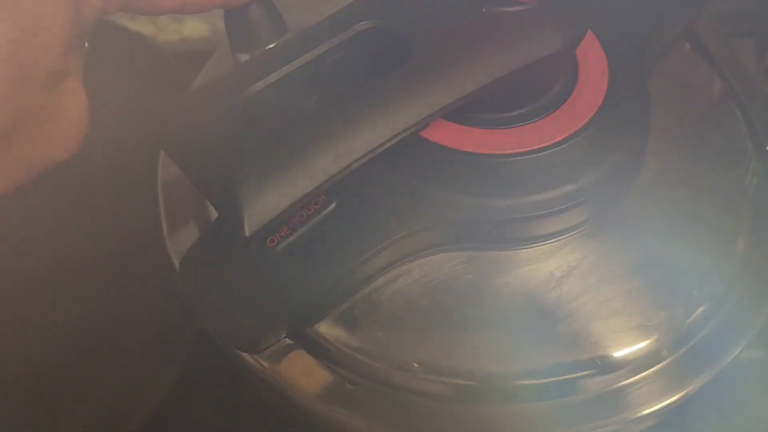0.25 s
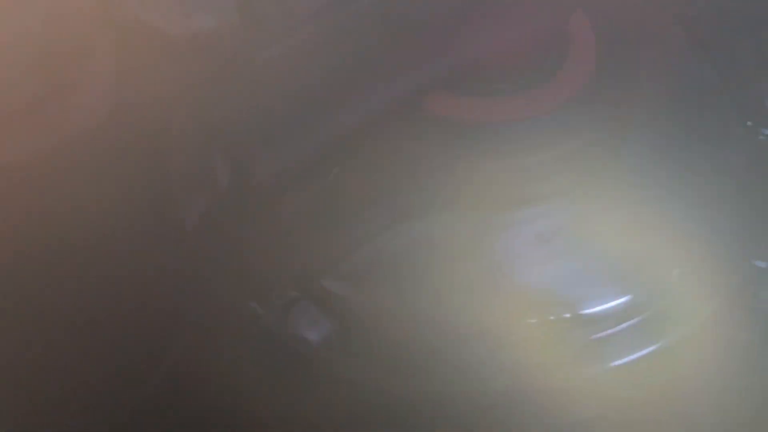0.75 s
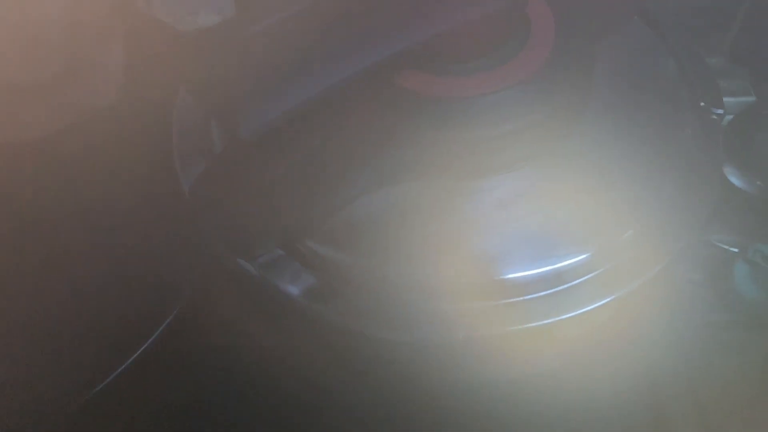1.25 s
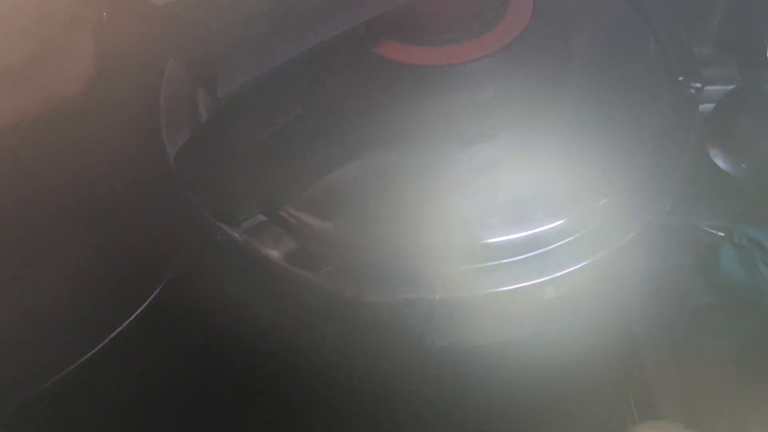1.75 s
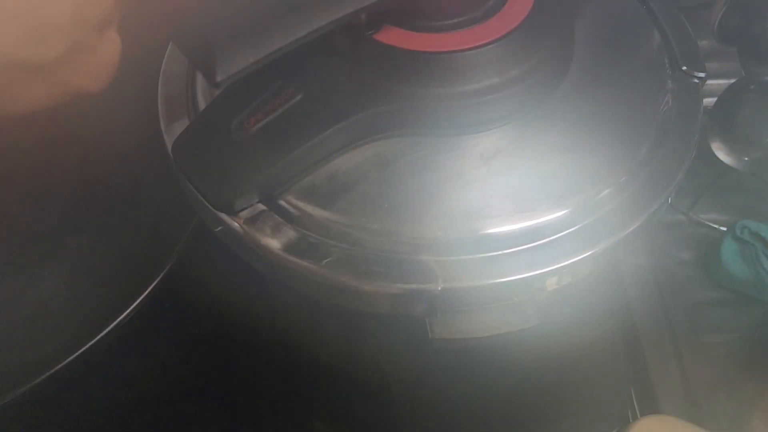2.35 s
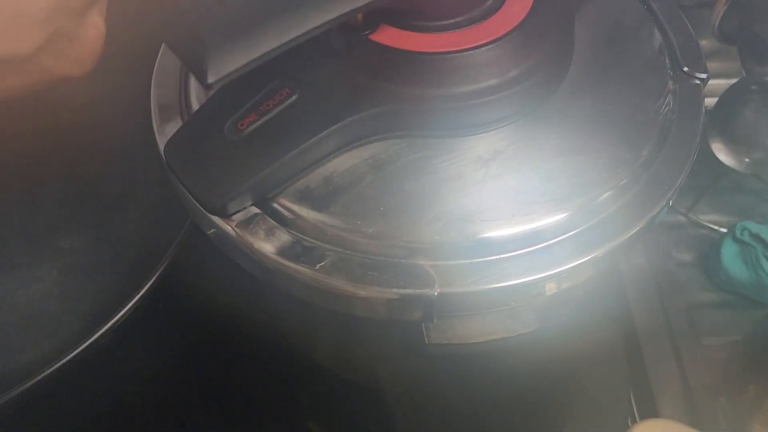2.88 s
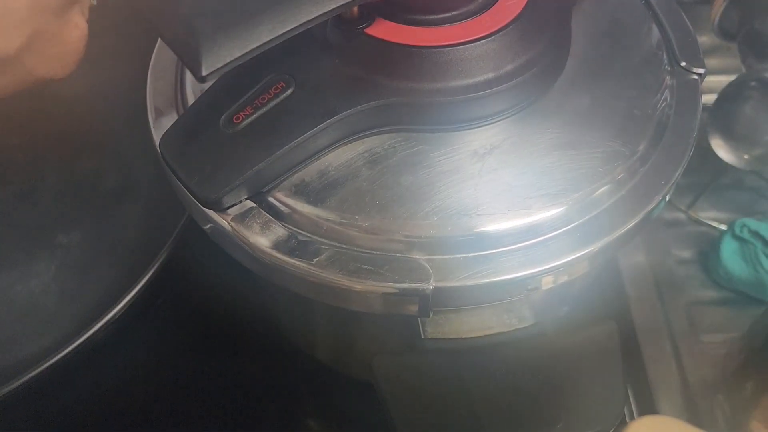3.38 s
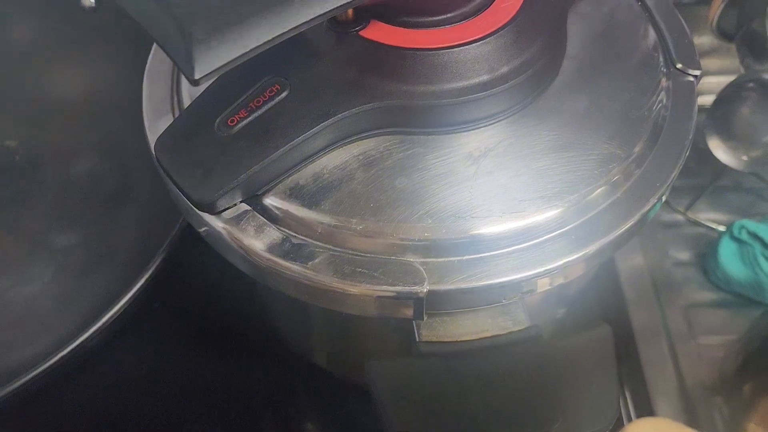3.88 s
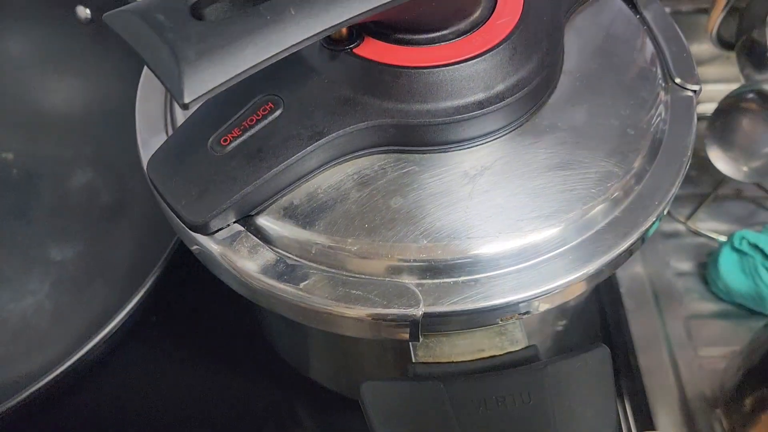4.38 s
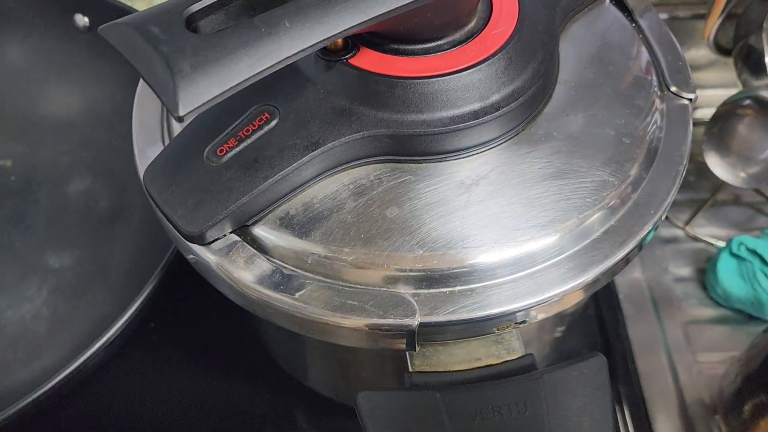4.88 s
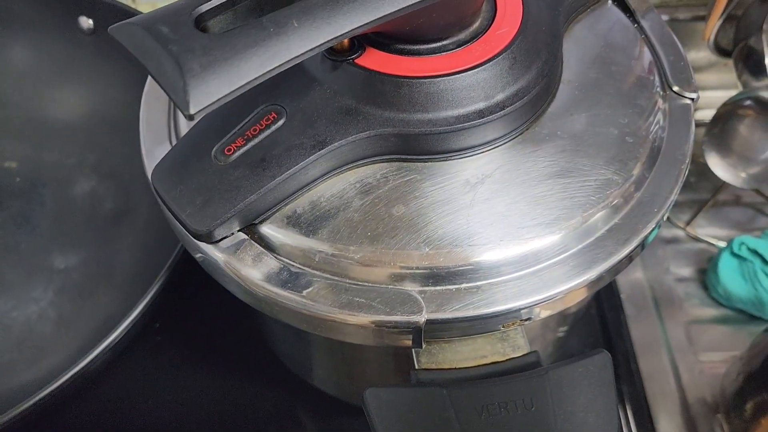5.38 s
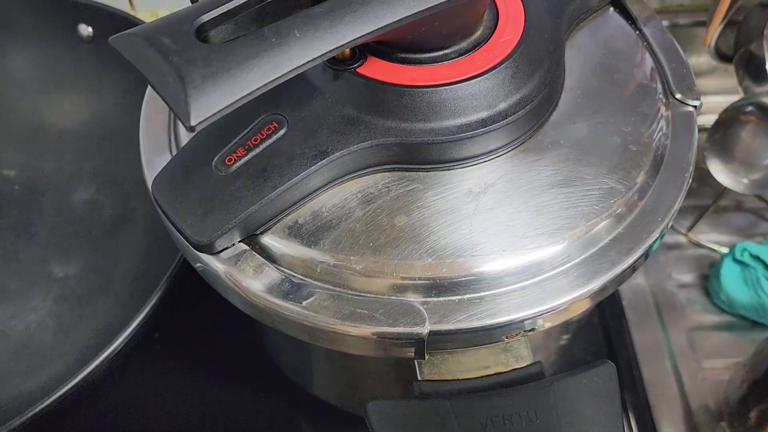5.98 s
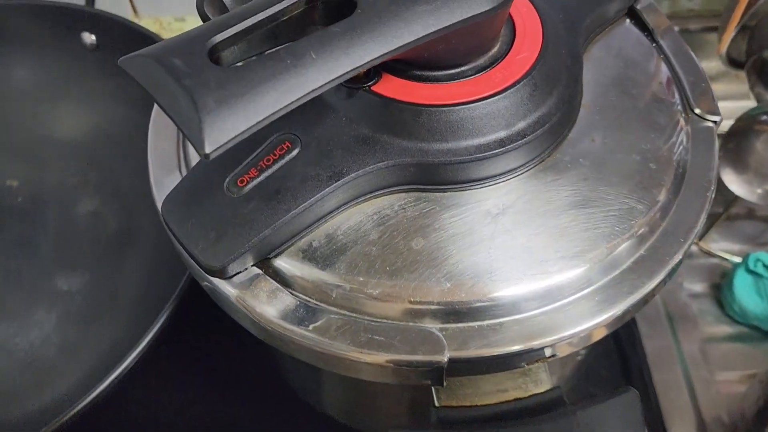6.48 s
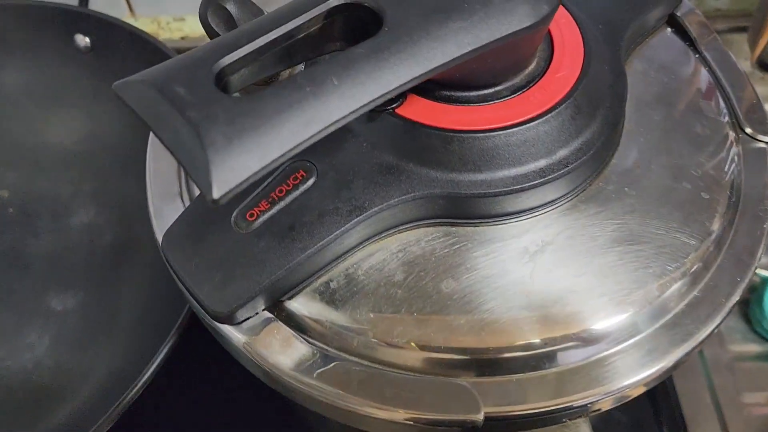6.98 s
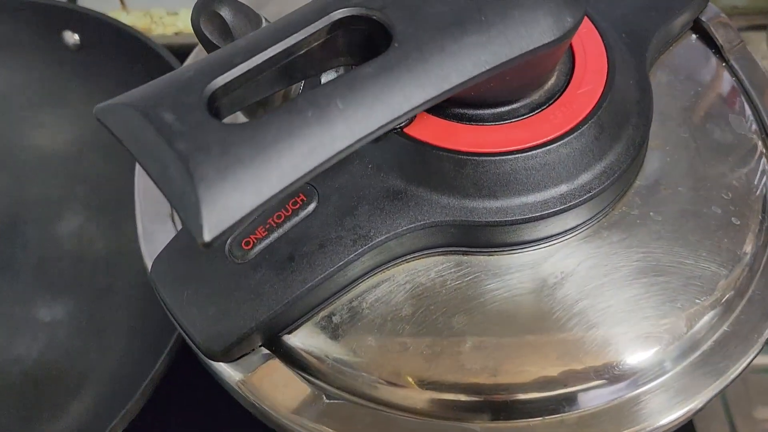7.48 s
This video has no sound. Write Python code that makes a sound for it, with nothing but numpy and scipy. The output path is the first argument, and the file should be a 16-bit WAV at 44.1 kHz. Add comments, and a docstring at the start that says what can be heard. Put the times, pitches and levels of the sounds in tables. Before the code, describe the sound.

A pressure cooker hisses steam, cuts off briefly with a rattle of lid clicks, then hisses on more weakly over a low fan hum.

```python
"""A small kitchen, a hand-held stereo phone close to the valve under a pressure cooker's handle.
Steam jets out over the low hum of a fan; as the pressure eases, an airy whistle forms at the valve's edge.
The valve pinches the jet at 1.3 s, snaps shut near 2 s with a rattle of the lid, leaks thinly for half a
second and is clicked open again. The jet runs on, weaker than at first, and from 6.4 s its colour shifts
as the phone leans in over the handle."""
import sys
import numpy as np
from scipy import signal
from scipy.fft import rfft, irfft
from scipy.io import wavfile
from scipy.ndimage import uniform_filter1d

SR = 44100
rng = np.random.default_rng(int(sys.argv[2]) if len(sys.argv) > 2 else 0)


def bounce(signal):
    """Save signal as a 16-bit WAV file at the path given by the first command-line argument."""
    frames = np.transpose(np.atleast_2d(signal))
    limited = np.clip(frames, -1, 1)
    pcm = np.round(limited * 32767).astype(np.int16)
    wavfile.write(sys.argv[1], SR, pcm)


N = 341334
T = np.arange(N) / SR
FREQS = np.fft.rfftfreq(N, 1 / SR)

# the hand draws the phone back, later leans it in over the handle: t/s, length/s, distance moved/m
DRAW_BACK, LEAN_IN = (0.23, 2.68, 0.1467), (6.4, 0.77, 0.08)


def undb(db):
    """Decibels to gain."""
    return 10 ** (np.asarray(db) / 20)


def over_pitch(hz, points_hz, values):
    """Values joined on a log-frequency axis."""
    return np.interp(np.log(hz + 1), np.log(points_hz), values)


def unit(x):
    """Scale to rms 1."""
    return x / np.sqrt(np.mean(x ** 2))


def tint(x, db):
    """Filter by a dB value for each frequency."""
    return irfft(rfft(x) * undb(db), N)


def walk(rate_hz):
    """A smooth random drift of rms 1, with little motion faster than rate_hz."""
    return unit(irfft(rfft(rng.standard_normal(N)) / (1 + (FREQS / rate_hz) ** 4), N))


def sides(pan_db):
    """Gains at the two microphones, the left louder by pan_db."""
    return undb(np.array([[pan_db], [-pan_db]]) / 2)


def ease(start_s, length_s):
    """A smooth move from 0 to 1."""
    return .5 - .5 * np.cos(np.pi * np.clip((T - start_s) / length_s, 0, 1))


def add(out, s, sound):
    """Mix a sound in at a time."""
    start = int(s * SR)
    out[:, start:start + sound.shape[1]] += sound


def turbulence(lead_s=.0003, mirror=0.89, diffuse=0.59, nearest_s=.0035, farthest_s=.016, count=14):
    """Steam noise at both microphones: direct, mirrored by lid, stove and tiles, and diffuse."""
    source = rng.standard_normal(N)
    moved_m = sum(metres * ease(s, length_s) for s, length_s, metres in (DRAW_BACK, LEAN_IN))
    moved_s = moved_m / 343  # speed of sound, m/s
    mics = []
    for lag in (0, int(lead_s * SR)):
        paths = zip(rng.uniform(nearest_s, farthest_s, count), rng.uniform(-1.002, 1, count))
        # each mirror path lengthens or shortens as the phone moves, so the hollow colour shifts
        mirrored = sum(np.interp(T - delay - slope * moved_s, T, source, left=0) for delay, slope in paths)
        mics.append(np.roll(source, lag) + mirror * unit(mirrored) + diffuse * rng.standard_normal(N))
    return unit(np.array(mics))


def jet_colour(spectrum, resonances):
    """Broad jet hump plus the peaks and notches of the gap under the handle, in dB per microphone."""
    hz, *mics = np.transpose(spectrum)
    db = np.array([over_pitch(FREQS, hz, mic) for mic in mics])
    for centre, width, left, right in resonances:
        db += np.outer([left, right], 1 / (1 + (2 * (FREQS - centre) / width) ** 2))
    return db - 10 * np.log10(1 + (hz[0] / (FREQS + 1)) ** 4)  # the bass rolls off


def jet(air, level_db=-24, head_db=3, head_s=1.52, surge_db=0.6, flutter_db=0.4, sway_db=0.58):
    """The main hiss: its colour follows the pressure and the phone, and the jet flutters in the valve."""
    # jet colour at full pressure, eased, and from right over the handle: f/Hz, left/dB, right/dB
    jet_full = [(251, -28, -24), (654, -16.5, -22.5), (990, -14.5, -9.5), (1480, -14, -5), (2220, -8, 2),
                (3050, -0.5, -5.5), (4000, 0, -6.5), (4850, 4, -0.5), (6350, 1, -5), (7400, -7, -17),
                (8530, -4, -14), (9800, -18.5, -14.5), (13000, -15, -19), (15500, -9, -17)]
    jet_eased = [(250, -43, -34), (645, -24, -34), (943, -15.5, -13), (1460, -13.5, -8), (2450, -6.5, -5),
                 (2900, -8, -10.5), (4260, -2, -13.5), (4670, -2.5, -8.5), (6030, -1, -12.5),
                 (7820, -6, -20), (8680, -13.5, -15), (9000, -18, -27), (13900, -15, -21.5),
                 (16000, -10, -12.5)]
    jet_close = [(252, -29, -31), (650, -20.5, -21), (1000, -17, -15.5), (1490, -14, -4), (2150, -7.5, -2),
                 (3020, -8.5, -6.5), (4030, -6, -5.5), (4930, 3, -6), (6300, -4.5, -14), (7600, -4, -16),
                 (8600, -9, -16), (9900, -17.5, -18), (13000, -15, -23), (15500, -11.5, -18)]
    # resonances between handle and lid in the same three states: f/Hz, width/Hz, left/dB, right/dB
    gap_full = [(1347, 94, 11, -18), (1594, 100, -5, 6), (1980, 150, 11, -11), (3850, 78, 9, -9),
                (4710, 370, 7, 0.5), (5410, 91, 9.5, -8), (6400, 180, 3, -3), (6670, 130, 6, 14.5),
                (7530, 160, 11.5, 5), (11240, 200, 6, -2)]
    gap_eased = [(1390, 380, -1.5, -2.5), (1920, 290, -0.5, -3.5), (2920, 82, 6.5, 7.5), (3050, 120, 7, -6),
                 (3334, 125, 4.5, 12.5), (3906, 110, 6.5, -1), (4033, 97, 7.5, -4), (4230, 100, 1.5, 14),
                 (4590, 70, -1, 13.5), (4815, 96, 7, 6), (5150, 110, 6, 4), (5480, 75, 5, 5),
                 (5890, 66, -0.5, 7), (6440, 230, 5.5, 10.5), (6650, 130, -5.5, 7), (7110, 140, -6, 0),
                 (7550, 140, 3, 10), (8480, 230, 8, -4), (8970, 140, 7, 16), (10740, 167, -13, 19)]
    gap_close = [(1340, 110, 4, -14), (1860, 130, 6.5, -5), (2750, 200, 4.5, -5), (3116, 120, 10, 2),
                 (3550, 72, 13.5, -2), (3890, 200, 8, -8), (4050, 150, 9, 10), (4600, 120, 3, 2),
                 (5200, 130, 2, 5), (5490, 120, 8, 4), (6200, 150, 5.5, 7), (10340, 220, 2, 6)]
    full = unit(tint(air, jet_colour(jet_full, gap_full)))
    eased = unit(tint(air, jet_colour(jet_eased, gap_eased)))
    close = unit(tint(air, jet_colour(jet_close, gap_close)))
    head = np.exp(-(T / head_s) ** 2)  # the first head of pressure falls as the pot vents
    lean = ease(*LEAN_IN[:2])
    hiss = head * full + (1 - head) * ((1 - lean) * eased + lean * close) + whistle()
    # large and small eddies, below and above 5 kHz, trade strength
    large = irfft(rfft(hiss) / (1 + (FREQS / 5000) ** 4), N)
    sway = undb(sway_db * walk(6.7))
    hiss = large * sway + (hiss - large) / sway
    db = level_db + head_db * head + surge_db * walk(3.1) + flutter_db * walk(59)
    return hiss * valve_opening() * undb(db)


def fan(trim_db=0.1, rush_db=-47, waver_db=2.0, wobble=0.23, pan_db=2.0, spread_hz=900):
    """The kitchen's background: a fan's wavering hum over its soft rush of air."""
    # fan tones: f/Hz, level/dB before trim and swell
    tones = [(59.2, -47), (145.3, -61), (296.1, -63.5), (436.0, -67.5)]
    # colour of the rushing air: f/Hz, relative level/dB
    rush_colour = [(20, -9), (42, 9), (75, -9.5), (95, -8.5), (120, 0), (160, -6.5), (200, -17.5),
                   (310, -5), (380, -8.5), (600, -9), (1000, -9.5), (2000, -13), (3200, -25), (8000, -32),
                   (16000, -42)]
    swell_db = 2.1 * np.cos(2 * np.pi * (T - 1.06) / 5.7)  # crests at 1.06 s and 5.7 s later
    hum = 0
    for hz, db in tones:
        phase = 2 * np.pi * hz * T + wobble * hz / tones[0][0] * walk(2.1)
        hum += np.sqrt(2) * undb(db + trim_db + swell_db + waver_db * walk(0.73)) * np.sin(phase)
    mid, side = tint(rng.standard_normal((2, N)), over_pitch(FREQS, *np.transpose(rush_colour)))
    side = irfft(rfft(side) * np.minimum(FREQS / spread_hz, 1), N)  # bass is alike at both microphones
    rush = unit(np.array([mid + side, mid - side]))
    return (hum + undb(rush_db) * rush) * sides(pan_db)


def whistle(hz=5560, width_hz=110, base_db=-18, lift_db=5.5, best_s=1.16, form_s=0.33, fade_s=3.7):
    """Eddies at the valve's edge ring one airy note that forms and slowly fades; dB against the jet."""
    peak_db = -20 * np.log10(1 + (2 * (FREQS - hz) / width_hz) ** 2)
    note = unit(tint(rng.standard_normal(N), peak_db))
    speaks = np.exp(-((T - best_s) / np.where(T < best_s, form_s, fade_s)) ** 2)
    return note * undb(base_db + lift_db * speaks) * sides(pan_db=5)


def knock(band_db, contact_s, soft_s, trim_db=-1, chatter=0.4, rise_cycles=1.3, spread_hz=1400):
    """One blow: the parts chatter briefly, ringing the lid's modes and the dense clatter of the pot."""
    # centres of thud, body, ring and tick, whose levels band_db gives: f/Hz
    band_hz = [170, 650, 2300, 9000]
    # modes of the lid with its handle: f/Hz, relative level/dB, t60/s
    lid_modes = [(121.4, -7, 0.3), (164, 4.5, 0.14), (237, -13, 0.16), (373, -18, 0.27), (646, -6, 0.14),
                 (659, 1, 0.11), (773, -3, 0.12), (1162, -3.5, 0.082), (1854, 3, 0.076), (2080, -5, 0.07),
                 (2370, -17, 0.056), (2820, 1, 0.057), (3180, 3, 0.071), (3680, 2, 0.053),
                 (6470, -1.5, .07), (7197, -4, 0.054), (8980, 0, .04)]
    # dense clatter of pot and stove top: f/Hz, relative level/dB, t60/s
    clatter = [(60, -41, 0.22), (150, -8, 0.21), (284, -19, 0.39), (480, -8.5, 0.18), (745, -8, 0.17),
               (1400, -8, 0.12), (2600, -2.5, 0.085), (4500, -5.5, 0.039), (7000, -3.5, 0.075),
               (11000, -4.5, 0.071), (16000, -12, .04)]
    t = T[:SR // 2]
    ring = np.zeros((2, len(t)))
    for hz, db, t60 in lid_modes:
        # low modes start with the push; high ones reach the two microphones out of step
        phase = rng.uniform(-1.52, 1, (2, 1)) * min(hz / spread_hz, np.pi)
        swell = 1 - np.exp(-t * hz / rise_cycles)
        fade = np.exp(-np.log(1000) * t / t60)
        gain = undb(db + trim_db + over_pitch(hz, band_hz, band_db))
        ring += gain * swell * fade * np.sin(2 * np.pi * hz * t + phase)
    centres, levels, t60s = np.transpose(clatter)
    for hz in 80 * 2 ** (np.arange(16) / 2):  # half-octave bands
        edges = hz * 2 ** (np.array([-1, 1]) / 4)
        bandpass = signal.butter(2, edges, "band", fs=SR, output="sos")
        mid, side = signal.sosfilt(bandpass, rng.standard_normal((2, 2 * len(t))))[:, len(t):]
        band = mid + min(hz / spread_hz, 1) * np.array([side, -side])
        # full strength while the parts touch, then a free decay
        fade = np.exp(-np.log(1000) * np.maximum(t - contact_s, 0) / over_pitch(hz, centres, t60s))
        db = over_pitch(hz, centres, levels) + over_pitch(hz, band_hz, band_db) + trim_db
        ring += undb(db) * unit(band) * fade
    ring *= 1 - np.exp(-t / soft_s)  # a soft contact builds up slowly
    # the force is uneven until the parts settle
    uneven = unit(uniform_filter1d(rng.standard_normal(len(t)), SR // 800))
    return ring * np.exp(chatter * uneven * np.exp(-t / contact_s))


def handle_bumps(contact_s=0.0043, soft_s=0.0031, tick_db=-10, pan_db=3):
    """The handle bumps softly on the lid, a little left of centre."""
    # bumps: t/s, thud/dB, body/dB, ring/dB
    bumps = [(1.241, -56, -36, -55), (1.963, -38, -30, -47), (2.565, -38, -23, -26), (2.627, -33, -53, -52),
             (2.679, -37, -49, -63), (3.241, -42, -42, -43)]
    out = np.zeros((2, N))
    for s, thud, body, ring in bumps:
        add(out, s, knock([thud, body, ring, ring + tick_db], contact_s, soft_s) * sides(pan_db))
    return out


def valve_clicks(contact_s=0.0038, soft_s=.0004, shrink=.72, loss_db=0.5):
    """The valve clicks hard on its seat; each rebound comes sooner and weaker than the last."""
    # clicks: t/s, thud/dB, body/dB, ring/dB, tick/dB, wait for the first rebound/s, number of rebounds
    clicks = [(1.263, -41, -32, -25.5, -35, .031, 2), (1.975, -25.5, -26, -17, -23.5, .015, 3),
              (2.034, -38, -30.5, -26.5, -37, .016, 1), (2.529, -38, -30.5, -14.5, -19, .006, 1),
              (2.576, -26.5, -20.5, -15.5, -25.5, .018, 1)]
    # a rebound's duller colour against its click: thud/dB, body/dB, ring/dB, tick/dB
    rebound_db = [-1, -5, -11.5, -9]
    out = np.zeros((2, N))
    for s, *band_db, gap_s, rebounds in clicks:
        add(out, s, knock(band_db, contact_s, soft_s))
        for k in range(rebounds):
            s += gap_s * shrink ** k
            add(out, s, knock(np.add(band_db, rebound_db) - k * loss_db, contact_s, soft_s))
    return out


def room(direct, level_db=-16, t60_s=0.29, top_hz=4500):
    """The direct sound with the short, dull ring of the kitchen walls behind it."""
    tail = rng.standard_normal((2, N)) * np.exp(-np.log(1000) * T / t60_s)
    walls = rfft(unit(tail)) / np.sqrt(N) / (1 + (FREQS / top_hz) ** 2)
    return direct + undb(level_db) * irfft(rfft(direct) * walls, N)


def valve_opening():
    """How far the valve stands open, 0-1: it first pinches the jet, then all but shuts it off."""
    # presses on the valve: pressed t/s, closing time/s, let up t/s, opening time/s, gap left/0-1
    closings = [(1.31, .11, 1.53, 0.22, 0.5), (1.915, 0.2, 2.526, 0.015, 0.01)]
    gap = np.ones(N)
    for pressed_s, closing_s, let_up_s, opening_s, gap_left in closings:
        gap *= 1 - (1 - gap_left) * (ease(pressed_s, closing_s) - ease(let_up_s, opening_s))
    return gap


def leak(air, pan_db=6, sputter_db=2.5):
    """Thin, sputtering steam slips past the seated valve: each spurt breaks through and dies away."""
    # colour of the leak: f/Hz, relative level/dB
    colour = [(2000, -16), (4200, -11), (5000, 4), (5600, 1), (6000, -3), (6600, -5), (8300, -5),
              (10000, -22), (15000, -22)]
    # spurts of steam: t/s, rise/s, level/dB, fade/(dB per s)
    spurts = [(2.163, .005, -46, 220), (2.274, .005, -50, 550), (2.292, .035, -50, 65),
              (2.475, .052, -46, 200)]
    hiss = unit(tint(air, over_pitch(FREQS, *np.transpose(colour))))
    flow = 0
    for s, rise_s, db, fade in spurts:
        flow += ease(s, rise_s) * undb(db - fade * np.maximum(T - s - rise_s, 0))
    return hiss * sides(pan_db) * flow * undb(sputter_db * walk(60))


def scene():
    """Steam and the rattling lid close to the microphones, the fan behind them."""
    air = turbulence()
    steam = jet(air) + leak(air)
    rattle = room(valve_clicks() + handle_bumps())
    return steam + rattle + fan()


def record(dry, top_hz=15800):
    """The phone clips at full scale and cuts the top."""
    lowpass = signal.ellip(10, .1, 80, top_hz, fs=SR, output="sos")
    return signal.sosfilt(lowpass, np.clip(dry, -1, 1))


dry = scene()
out = record(dry)
bounce(out)
```